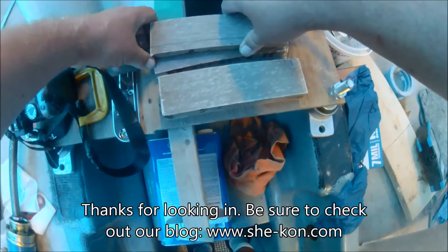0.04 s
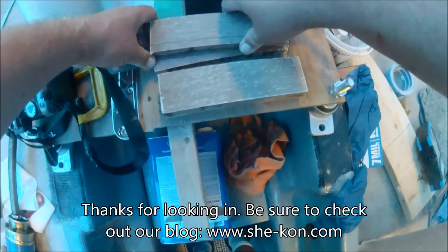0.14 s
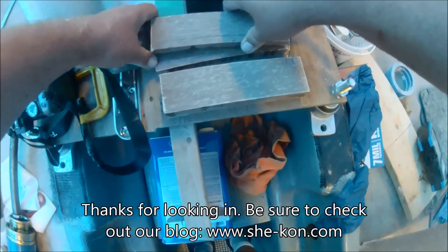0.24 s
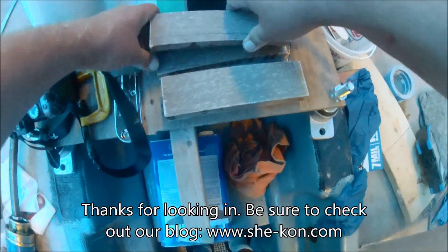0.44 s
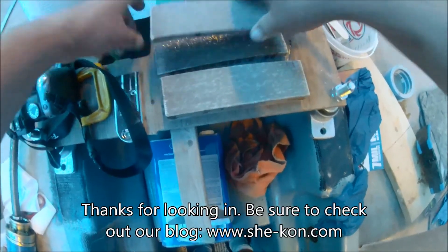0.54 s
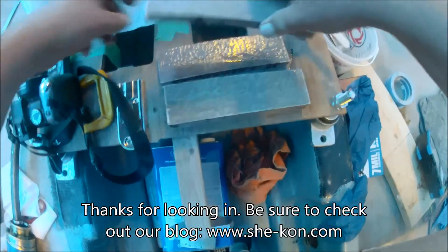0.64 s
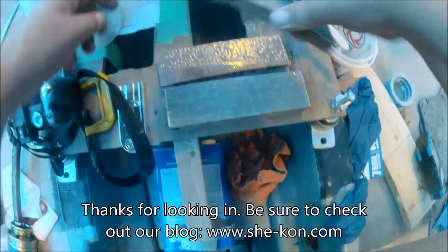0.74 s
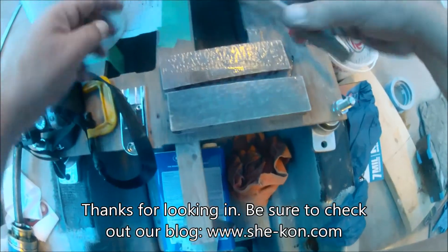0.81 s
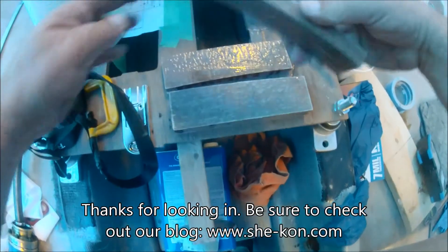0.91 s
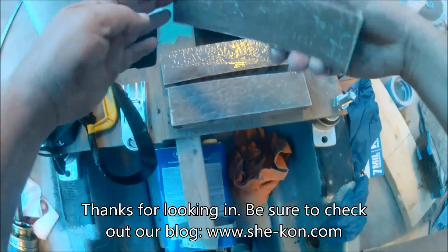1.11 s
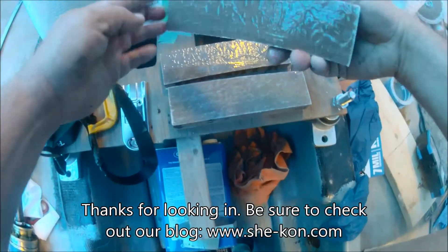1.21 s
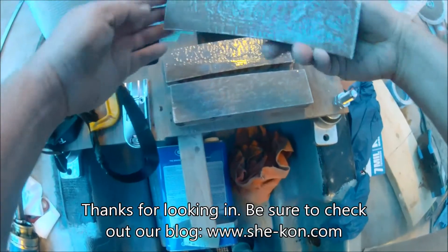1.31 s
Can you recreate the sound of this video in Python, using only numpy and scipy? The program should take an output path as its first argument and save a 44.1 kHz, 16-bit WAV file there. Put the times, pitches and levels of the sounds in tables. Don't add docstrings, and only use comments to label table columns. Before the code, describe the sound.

A plywood block strikes other blocks on a hollow workbench, clacking and booming, rocks back twice more softly, then drags faintly as it lifts; quiet workshop hum, close small gritty camera microphone.

```python
import sys
import numpy as np
from scipy import signal
from scipy.fft import rfft, irfft
from scipy.io import wavfile
from scipy.ndimage import uniform_filter1d

SR = 44100
rng = np.random.default_rng(int(sys.argv[2]) if len(sys.argv) > 2 else 0)


def boost_factor(decibels):
    exponent = np.asarray(decibels, float) / 20
    return 10 ** exponent


def transcribe(signal):
    frames = np.atleast_2d(signal).T
    limited = np.clip(frames, -1, 1)
    pcm = np.round(limited * 32767).astype(np.int16)
    wavfile.write(sys.argv[1], SR, pcm)


N = 59535


def evened(x):
    return x / np.sqrt(np.mean(x ** 2) + 1e-20)


def add(mix, start_s, sound):
    part = mix[round(start_s * SR):][:len(sound)]
    part += sound[:len(part)]


def ring(modes, colour_db):
    t = np.arange(SR // 2) / SR
    total = np.zeros(len(t))
    for (hz, db, t60), change_db in zip(modes, colour_db):
        total += boost_factor(db + change_db - 60 * t / t60) * np.sin(2 * np.pi * hz * t)
    return total


# frequency [Hz], level [dB per Hz].
AIR_SPECTRUM = [(50, -1.5), (120, -9), (230, 0.5), (420, -16), (750, -12.5), (1950, -25), (3300, -20.5),
                (4000, -30)]
AIR_DB, PATCHY_DB, LUMPY_DB = -44.5, 1.5, 0.8


def workshop_air():
    table_hz, table_db = np.transpose(AIR_SPECTRUM)
    hz = np.fft.rfftfreq(N, 1 / SR)
    shape = boost_factor(np.interp(np.log(hz + 1), np.log(table_hz), table_db))
    shape = shape * (1 - np.exp(-(hz / 35) ** 2))
    noise = irfft(rfft(rng.standard_normal(N)) * shape, N)
    z = signal.stft(noise, nperseg=512, noverlap=384)[2]
    patches = uniform_filter1d(rng.standard_normal(z.shape), size=6, axis=0)
    patches = evened(uniform_filter1d(patches, size=12, axis=1))
    bass = np.fft.rfftfreq(512, 1 / SR) < 400
    z = z * boost_factor((PATCHY_DB + LUMPY_DB * bass)[:, None] * patches)
    return boost_factor(AIR_DB) * evened(signal.istft(z, nperseg=512, noverlap=384)[1][:N])


# time in
# seconds [s], pitch [Hz], level [dB].
BOOM_CURVE = [
    (0.222, 160.8, -27),
    (0.228, 159.3, -22),
    (0.25, 157.6, -21),
    (0.26, 163, -34),
    (0.268, 157.0, -19.5),
    (0.29, 151, -16),
    (0.324, 148.5, -33),
    (0.347, 150.4, -20),
              (0.348, 150, -24.5),
    (0.356, 150.6, -19.5),
    (0.4, 149.4, -18),
    (0.478, 146.1, -39.5),
    (0.488, 143, -70),
    (0.5, 143, -45),
              (0.501, 148, -48),
    (0.509, 143, -61),
    (0.531, 144.2, -33.5),
    (0.557, 143.7, -42.5),
    (0.567, 146, -71),
    (0.571, 145, -52),
    (0.607, 151.2, -42),
    (0.64, 151, -71),
              (0.641, 145, -76),
    (0.655, 148.3, -35),
    (0.723, 147, -41),
    (0.741, 149, -56),
    (0.757, 153.0, -36.5),
    (0.783, 156.3, -36),
    (0.815, 168, -52),
    (0.835, 160.4, -39),
    (0.88, 171, -64),
]


def bench_boom():
    s, hz, db = np.transpose(BOOM_CURVE)
    t = np.arange(N) / SR
    fade_in = np.clip((t - s.min()) / 0.003, 0, 1)
    fade_out = np.clip((s.max() - t) / 0.028, 0, 1)
    phase = 2 * np.pi * np.cumsum(np.interp(t, s, hz)) / SR
    return np.sqrt(2) * fade_in * fade_out * boost_factor(np.interp(t, s, db)) * np.sin(phase)


# frequency [Hz], level [dB], decay by 60 dB [s].
BENCH_MODES = [(252, -12, 0.36), (282.8, -7, 0.18), (331.9, -6.5, 0.2), (358, 1.5, 0.093),
               (384.1, -5.5, 0.25), (483, -3, 0.092), (538.7, -12.5, 0.18), (573.6, -8, .16),
               (758, -8.5, 0.14), (838, -8.5, 0.081), (935, -11.5, 0.084), (1036, -13.5, 0.18),
               (1103, -7.5, 0.078), (1140, -15, 0.081)]
BODY_RISE_S = 0.00074


def bench_body(contact_ms, colour_db):
    t = np.arange(SR // 2) / SR
    push = np.hanning(int(contact_ms * SR / 1000) + 3)
    body = ring(BENCH_MODES, colour_db) * (1 - np.exp(-t / BODY_RISE_S))
    return np.convolve(body, push / push.sum())[:len(t)]


# frequency [Hz], level [dB], decay by 60 dB [s].
BLOCK_MODES = [(1003, -8, 0.045), (1546, -2.5, 0.084), (1686, -18, 0.047), (2063, -11, 0.018),
               (2483, -15.5, 0.021), (2868, -15, 0.052), (3076, -15, 0.02), (3222, -4, 0.028),
               (3567, -6, 0.026)]
CRACK_DB, CRACK_T60, CLACK_RISE_S = 7, 0.041, 0.00034


def block_clack(colour_db):
    t = np.arange(SR // 2) / SR
    crack = boost_factor(CRACK_DB - 60 * t / CRACK_T60) * rng.standard_normal(len(t))
    return (ring(BLOCK_MODES, colour_db) + crack) * np.minimum(t / CLACK_RISE_S, 1)


# start in seconds [s], body level [dB], clack level [dB], contact [ms].
CONTACTS = [(0.2255, -18.5, -16.5, 0.48), (.2285, -15.5, -17.5, 1.46), (.2360, -18, -17, 1.18),
            (.2490, -41, -33, 2.6), (0.255, -8, -36, 1.23), (0.2584, -11.5, -38, 1.06),
            (0.2662, -21.5, -37, 1.13), (.2780, -17.5, -42, 1.64), (.3490, -16.5, -40.5, 1.84),
            (0.3583, -20.5, -62, 1.79), (.3890, -21, -40, 2.07), (.5180, -50, -65, 1.8),
            (0.647, -43, -57, 2.1), (.7150, -46.5, -50, 0.61), (.7510, -52, -47, 0.55)]
UNDER_HZ, UNDER_T60, THUD_DB = 82, 1, -29


def knocks():
    wood, legs = np.zeros(N), np.zeros(N)
    colours_db = 2.5 * rng.standard_normal((len(CONTACTS), 24))
    for (start_s, body_db, clack_db, contact_ms), colour_db in zip(CONTACTS, colours_db):
        add(wood, start_s, boost_factor(body_db) * bench_body(contact_ms, colour_db))
        add(wood, start_s, boost_factor(clack_db) * block_clack(colour_db[len(BENCH_MODES):]))
        add(legs, start_s, ring([(UNDER_HZ, body_db + THUD_DB, UNDER_T60)], colour_db))
    return wood, legs


ROOM_DB, ROOM_T60 = -14, 0.31


def room(x):
    t = np.arange(SR // 2) / SR
    tail = rng.standard_normal(len(t)) * boost_factor(-60 * t / ROOM_T60) * (t > 0.004)
    return boost_factor(ROOM_DB) * signal.fftconvolve(x, tail / np.linalg.norm(tail))[:N]


def scuff(length_s, rasp_db, ring_db):
    t = np.arange(SR // 5) / SR
    unevenness = evened(uniform_filter1d(rng.standard_normal(len(t)), size=60))
    slips = evened(rng.standard_normal(len(t)) * boost_factor(3.5 * unevenness))
    slips = slips * np.sin(np.pi * np.clip(t / length_s, 0, 1) ** 0.91)
    rasp = signal.lfilter(*signal.butter(1, 2500, fs=SR), slips)
    mode_hz, width_hz = 508, 11
    mode = np.exp(-np.pi * width_hz * t) * np.sin(2 * np.pi * mode_hz * t)
    rung = signal.fftconvolve(slips, mode)[:len(t)]
    return boost_factor(rasp_db) * rasp + boost_factor(ring_db) * rung / abs(rung).max()


# start in seconds [s], length [s], rasp level [dB], ring level [dB].
DRAGS = [
    (.712, 0.019, -38.5, -44),
    (.749, 0.025, -33.5, -47),
    (.770, 0.02, -41.5, -52),
]


def lift_off():
    drags = np.zeros(N)
    for start_s, length_s, rasp_db, ring_db in DRAGS:
        add(drags, start_s, scuff(length_s, rasp_db, ring_db))
    return drags


TICK_S, TICK_DB, TICK_HZ, TICK_T60, TICK_SPLIT = 1.0530, -42.5, 2870, 0.021, 1.18


def tick():
    t = np.arange(SR // 20) / SR
    modes = np.sin(2 * np.pi * TICK_HZ * t) + np.sin(2 * np.pi * TICK_HZ * TICK_SPLIT * t)
    return boost_factor(TICK_DB - 60 * t / TICK_T60) * modes


FLOOR_HZ, UNDER_DB = 130, -29.5


def scene():
    background = workshop_air()
    wood, legs = knocks()
    wood = wood + lift_off()
    add(wood, TICK_S, tick())
    wood = wood + room(wood)
    above = signal.sosfilt(signal.butter(3, FLOOR_HZ, "high", fs=SR, output="sos"), wood)
    return (above + boost_factor(UNDER_DB) * wood + legs + bench_boom() + background)[None]


def low_pass(x):
    return signal.sosfilt(signal.butter(12, 16590, fs=SR, output="sos"), x)


KEPT_HZ, HOLD, EDGE_HZ = 8000, 4, 15250
ROLL_HZ, ROLL_WIDTH_HZ, ROLL_DB = 3940, 480, -11.5
GRIT_DB, GRIT_S = -20.5, 0.0093


def record(dry):
    count = N * KEPT_HZ // SR
    slow = signal.resample(dry[0], count)
    hz = np.fft.rfftfreq(count, 1 / KEPT_HZ)
    roll = np.clip(1 - (ROLL_HZ - hz) / ROLL_WIDTH_HZ, 0, 1) ** 2
    slow = irfft(rfft(slow) * boost_factor(ROLL_DB * roll), count)
    slope = uniform_filter1d(abs(np.diff(slow, prepend=0)), size=int(GRIT_S * KEPT_HZ))
    slow = slow + boost_factor(GRIT_DB) * slope * rng.standard_normal(count)
    held = rfft(np.repeat(slow, HOLD))
    held = held * (np.arange(len(held)) * SR / N < EDGE_HZ)
    mix = irfft(held, N) * N / (count * HOLD)
    return low_pass(mix[None])


dry = scene()
out = record(dry)
transcribe(out)
```